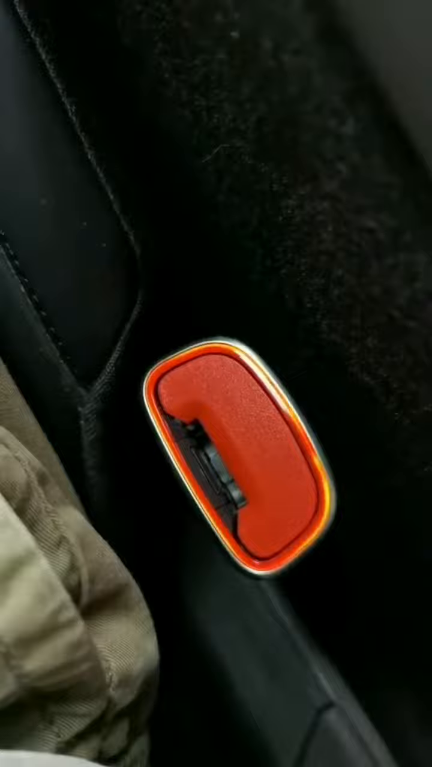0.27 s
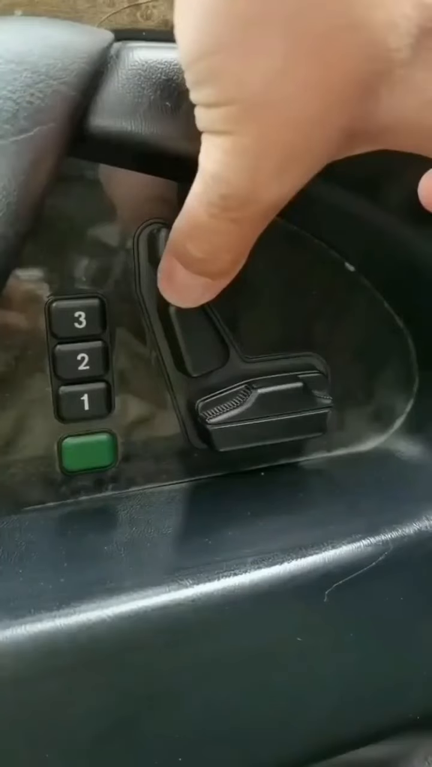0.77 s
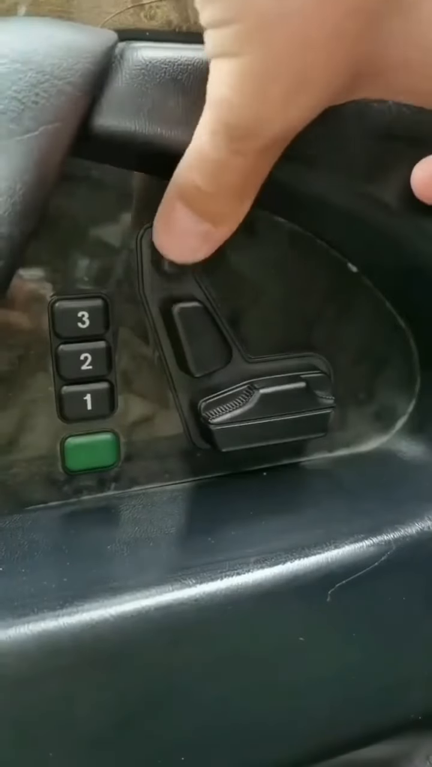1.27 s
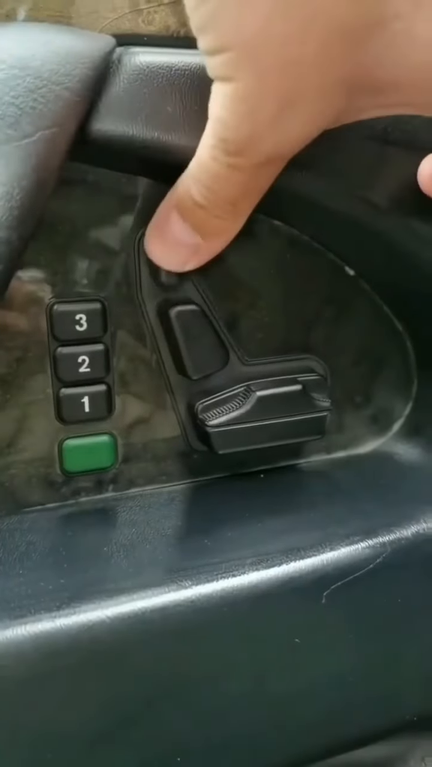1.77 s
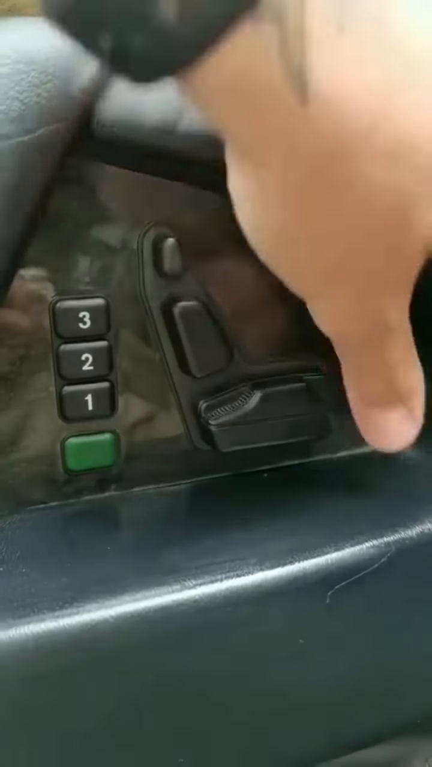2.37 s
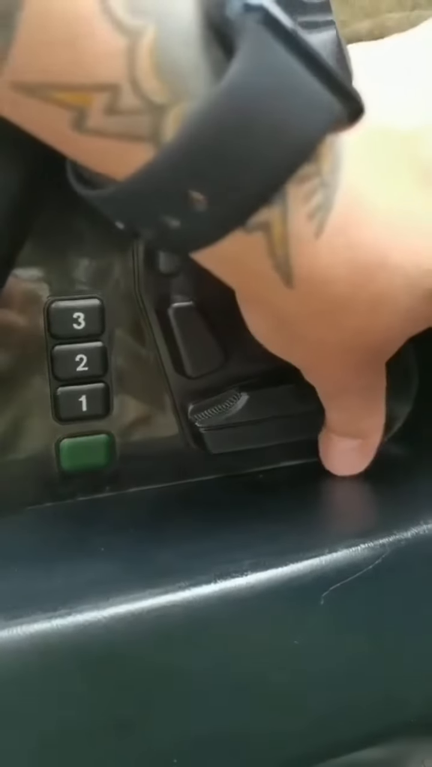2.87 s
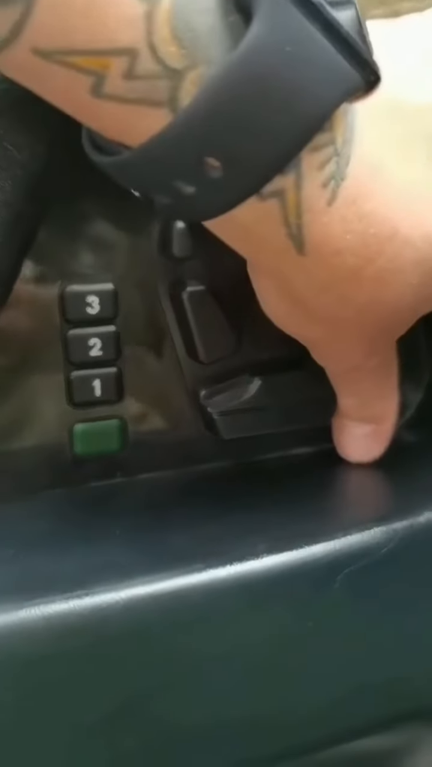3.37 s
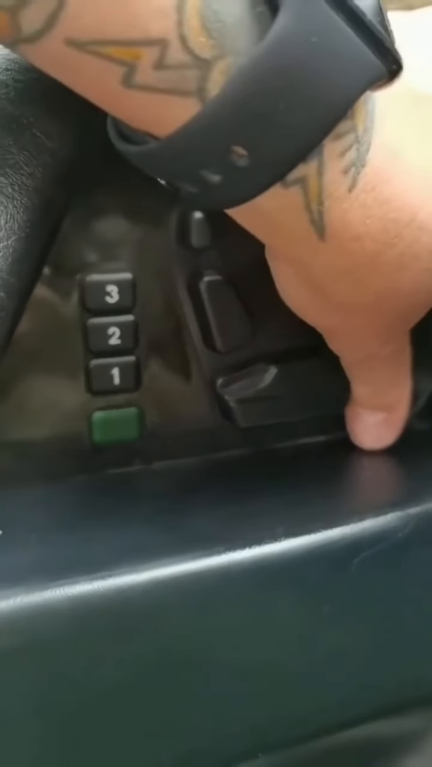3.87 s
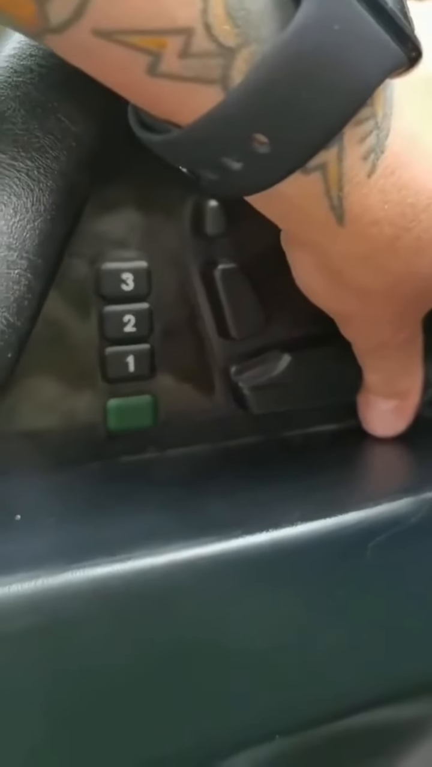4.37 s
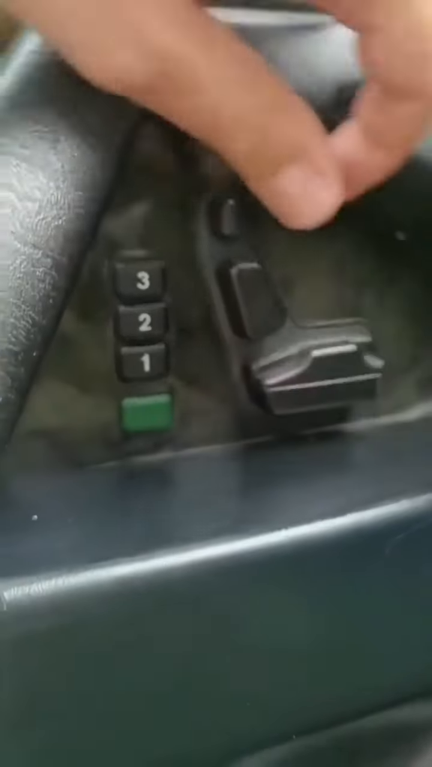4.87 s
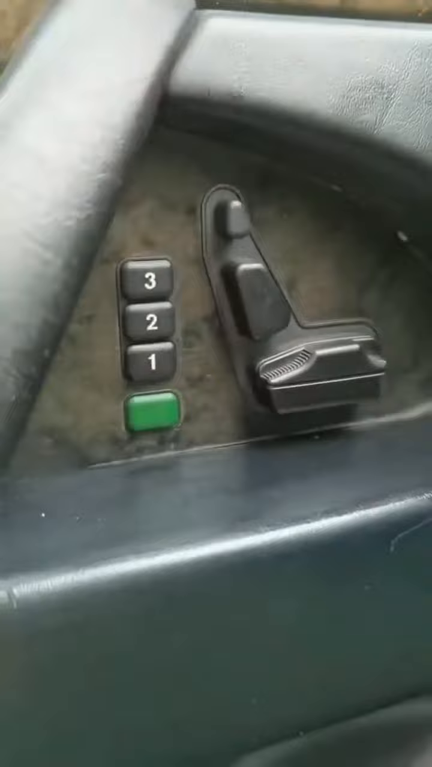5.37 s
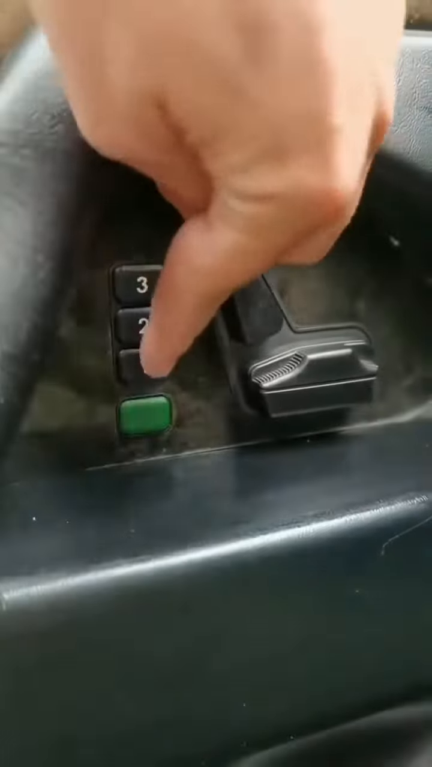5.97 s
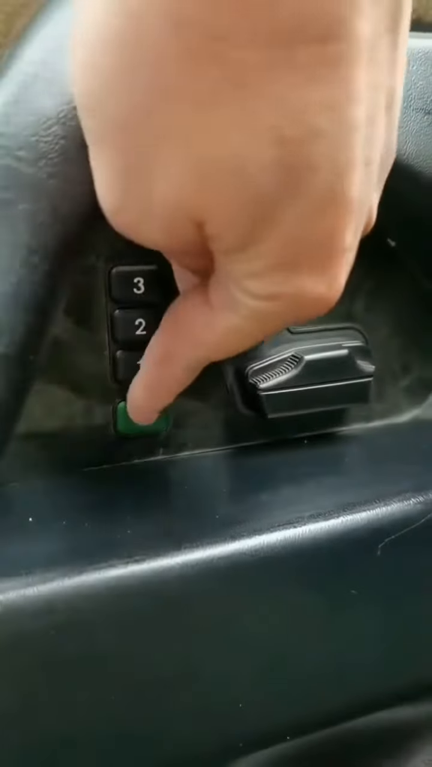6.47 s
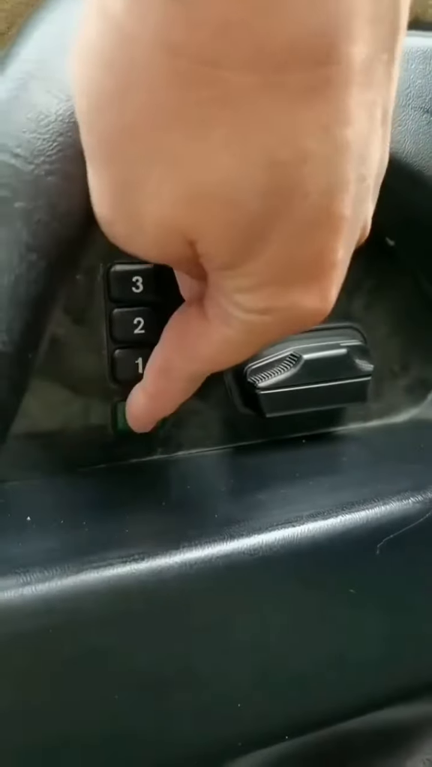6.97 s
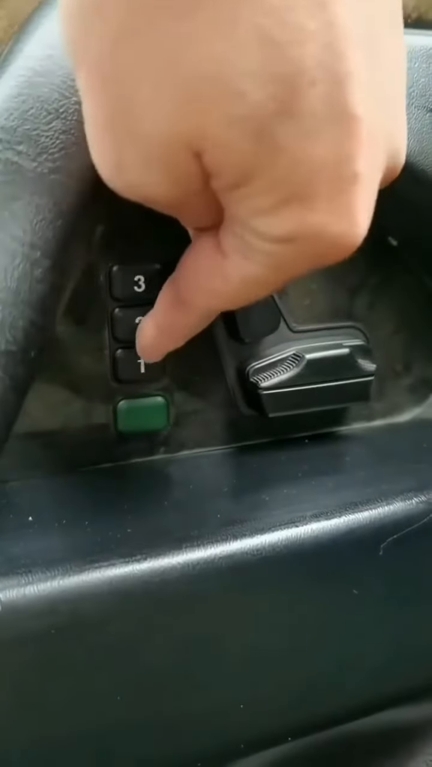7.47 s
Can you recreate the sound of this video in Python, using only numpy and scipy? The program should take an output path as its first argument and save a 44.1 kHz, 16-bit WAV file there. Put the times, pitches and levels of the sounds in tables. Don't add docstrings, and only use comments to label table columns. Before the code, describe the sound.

Inside an idling car, plastic seat switches snap and creak under a thumb, a small electric motor whirs briefly, then softer button clicks follow.

```python
import sys
import numpy as np
from scipy import signal
from scipy.fft import rfft, irfft
from scipy.io import wavfile
from scipy.ndimage import uniform_filter1d

SR = 44100
rng = np.random.default_rng(int(sys.argv[2]) if len(sys.argv) > 2 else 0)


def store_wav(level_fs):
    pcm = np.round(np.clip(np.atleast_2d(level_fs), -1, 1) * 32767)
    wavfile.write(sys.argv[1], SR, pcm.T.astype(np.int16))


def magnitude_from_level(level_db):
    exponent = np.asarray(level_db, float) / 20
    return 10 ** exponent


N = 340452
T = np.arange(N) / SR
LEAD_S = .007


def unit(x):
    return x / np.sqrt(np.mean(x ** 2))


def peak(x, db):
    return x * magnitude_from_level(db) / np.abs(x).max()


def coloured(points):
    hz, db = np.transpose(points)
    log_f = np.log(np.arange(N // 2 + 1) * SR / N + 1)
    gain = magnitude_from_level(np.interp(log_f, np.log(hz), db, left=-160, right=-160)) * np.sqrt(SR / 2)
    return irfft(rfft(rng.standard_normal(N)) * gain, N)


def ring(x, hz, width_hz):
    return signal.lfilter(*signal.iirpeak(hz, hz / max(width_hz, 20), SR), x)


def band(x, lo_hz, hi_hz):
    return signal.sosfilt(signal.butter(3, [lo_hz, hi_hz], "band", fs=SR, output="sos"), x)


def high(x, order, hz):
    return signal.sosfilt(signal.butter(order, hz, "high", fs=SR, output="sos"), x)


def walk(rate):
    k = int(SR / rate)
    held = np.repeat(rng.standard_normal(N // k + 1), k)
    return 0.57 * uniform_filter1d(uniform_filter1d(held, k), k)[:N]


def swell(s, half_s):
    out = np.zeros(N)
    near = slice(max(int((s - 3 * half_s) * SR), 0), int((s + 3 * half_s) * SR))
    out[near] = magnitude_from_level(-9.5 * ((T[near] - s) / max(half_s, .01)) ** 2)
    return out


def add(out, s, x):
    i = int(s * SR)
    out[i:i + len(x)] += x[:N - i]


def first_shot():
    # f/Hz, density/dB per Hz
    hum_colour = [(15, -30), (25, -4), (183, -11.5), (244, -7.5), (300, -5), (456, -20), (507, -22),
                  (609, -27.5), (658, -33), (878, -31.5), (1030, -31.5), (1140, -39.5), (1780, -41),
                  (2400, -45), (2700, -58), (8300, -71), (9200, -65), (12800, -62)]
    hum = coloured(hum_colour)[None]
    hum = unit(.3 * hum + .7 * patchy(hum)) * magnitude_from_level(-52.5 + np.interp(T, [0, .5], [-1.5, 1.5]))
    return hum + magnitude_from_level(-82) * band(rng.standard_normal((2, N)), 240, 7300)


def engine():
    # t/s, crank turns per s
    idle = [(.5, 15.24), (2.5, 15.3), (5, 15.26), (6, 15.37), (7.72, 15.44)]
    # multiple of the crank rate, left level/dB, right level/dB
    orders = [(1.92, -70.5, -87), (3.174, -55, -66), (3.973, -58, -65.5), (5, -52, -73), (5.975, -43, -64),
              (6.95, -51, -72), (8.04, -58.5, -67), (9.59, -74, -81), (9.97, -59.5, -65.5),
              (11.21, -61, -80), (11.71, -64, -82.5), (12.8, -84.5, -81.5), (13.84, -66, -84),
              (14.83, -67, -76.5), (16.19, -64.5, -74), (18.22, -64, -84.5), (17.5, -78.5, -104),
              (20.2, -67, -89.5), (20.63, -68.5, -92.5), (24.7, -87.5, -90)]
    # f/Hz, left density/dB per Hz, right density/dB per Hz
    bed_colour = [(25.6, -78, -96.5), (49, -78, -89.5), (102.6, -65.5, -86.5), (170, -69, -88),
                  (300, -82.5, -99), (513, -87.5, -111), (752, -100, -118), (1133, -99, -119),
                  (1600, -101, -121), (2468, -113, -124), (2870, -117, -124), (5360, -120.5, -124),
                  (7540, -127, -130), (8400, -138, -140), (8700, -129, -133), (13500, -130, -133)]
    boom_hz, boom_width_hz = 89.4, 18
    turn = 2 * np.pi * np.cumsum(np.interp(T, *np.transpose(idle))) / SR + 1.509
    out = np.zeros((2, N))
    for k, *ports_db in orders:
        lag = 2.115 * np.arctan((k * idle[0][1] - boom_hz) / boom_width_hz)
        phase = k * (turn - np.array([[0], [1.01]])) + np.array([[0], [3.1]])
        phase = phase - lag + 0.094 * walk(3.5)
        out += np.sqrt(2) * magnitude_from_level(np.c_[ports_db]) * magnitude_from_level(1.1 * walk(4)) * np.cos(phase)
    throb = unit(magnitude_from_level(2.6 * np.cos(2 * turn + .5) + 2.1 * np.cos(turn + .3)))
    hz, *ports_density = np.transpose(bed_colour)
    for side, db in zip(out, ports_density):
        bed = coloured(np.transpose([hz, db]))
        hiss = high(bed, 2, 2500)
        side += (bed - hiss) * throb * magnitude_from_level(2.0 * walk(3.8)) + hiss
    return out


def wind():
    # f/Hz, density/dB per Hz
    wind_colour = [(25, -16.5), (50, 0.5), (120, 2), (200, -9), (400, -19.5), (900, -37), (2000, -46)]
    # middle t/s, peak level/dB, half length/s
    gusts = [(0.703, -51, 0.037), (.85, -55.5, .05), (1.05, -69, .08), (1.907, -60.5, 0.18),
             (3.333, -57, 0.07), (3.99, -50, 0.15), (4.15, -46.5, 0.078), (4.359, -46.5, 0.075),
             (4.549, -50.5, 0.13), (4.783, -47.5, 0.1), (5.186, -46.5, 0.19), (5.481, -55.5, 0.11),
             (5.808, -59.5, 0.13), (6.252, -61.5, 0.14), (6.843, -56.5, 0.051), (7.097, -59, .1),
             (7.4, -63, 0.081)]
    turbulence = unit(coloured(wind_colour) * magnitude_from_level(2.5 * walk(35)))
    return turbulence * (magnitude_from_level(-72.5) + sum(magnitude_from_level(db) * swell(s, half_s) for s, db, half_s in gusts))


def fan():
    # f/Hz, width/Hz, level/dB
    ducts = [(1114.5, 53, -82), (1593, 60, -85), (2147, 350, -89.5)]
    out = np.zeros(N)
    for hz, width_hz, db in ducts:
        air = ring(ring(rng.standard_normal(N), hz, width_hz), hz, width_hz * 2)
        out += unit(air) * magnitude_from_level(db + 5.9 * walk(11.0))
    return out


def rub():
    # f/Hz, density/dB per Hz
    rub_colour = [(1500, -16.5), (2500, 18.5), (4200, 20), (5900, 19.5), (7300, -3.5), (8000, -34),
                  (13000, -40)]
    # middle t/s, half length/s, hiss level/dB, panel level/dB
    strokes = [(0.611, 0.051, -72, -65), (0.768, 0.088, -90, -63.5), (1.499, 0.08, -74.5, -63.5),
               (1.879, 0.17, -79.5, -65), (1.925, 0.046, -71, -67), (2.454, 0.34, -105, -78.5),
               (2.98, 0.058, -66.5, -70), (3.122, 0.1, -76, -63), (3.284, 0.041, -80, -63),
               (4.787, 0.14, -71, -65), (4.895, 0.039, -71, -65), (5.095, 0.059, -71.5, -70),
               (5.308, 0.04, -76, -77), (5.486, 0.083, -74, -78.5), (6.02, 0.13, -100, -73.5),
               (6.664, 0.18, -100, -74.5), (7.069, 0.083, -86, -71.5), (7.655, 0.076, -110, -71),
               (7.404, 0.1, -80, -69), (6.47, 0.046, -91.5, -84)]
    grain = magnitude_from_level(7.5 * walk(300) + 2.8 * walk(36))
    hiss = unit(coloured(rub_colour) * grain)
    panel = unit(band(rng.standard_normal(N) * grain, 450, 1500))
    return sum(swell(s, half_s) * (hiss * magnitude_from_level(hiss_db) + panel * magnitude_from_level(panel_db))
               for s, half_s, hiss_db, panel_db in strokes)


def push():
    t = T[:SR // 8] - LEAD_S
    return np.exp(-((t - .0015) / 0.0002) ** 2)


def slip(snap_db, panel_db, panel_hz, air_db, bright_hz):
    # f/Hz, width/Hz, level/dB
    cap_modes = [(1830, 340, -6.5), (2260, 350, 4), (2600, 1500, 0), (3426, 280, 2.5), (4050, 200, 4.5),
                 (4600, 260, -3), (5390, 170, 3), (5920, 310, 3.5), (6600, 400, -9)]
    # f/Hz, width/Hz, level/dB
    air_modes = [(7300, 410, 0.5), (8000, 770, 3.5), (9070, 400, -1), (10420, 700, -8.5),
                 (12200, 680, -1.5), (9700, 17000, -6)]
    t = T[:SR // 8] - LEAD_S
    late = np.maximum(t, 0)
    skirt = 0.34 * np.exp(np.minimum(t, 0) / 0.002) * (np.exp(-late / 0.0082) + 0.15 * np.exp(-late / 0.032))
    shape = late ** 2 * np.exp(-late / 0.00077) / 0.00063 ** 2 + skirt
    noise = rng.standard_normal((2, len(t)))
    instant = 2.5 * np.exp(-((t - .0013) / .00003) ** 2)
    blow = noise[0] * shape * magnitude_from_level(3.0 * noise[1]) + instant

    snap = np.zeros(len(t))
    for hz, width_hz, db in cap_modes:
        level_spread, pitch_spread = rng.standard_normal(2)
        snap += magnitude_from_level(db + 2.0 * level_spread) * ring(blow, hz * (1 + .02 * pitch_spread), width_hz)
    snap = band(0.35 * snap + 0.05 * blow + ring(snap + 1.3 * blow, bright_hz, 560), 1500, 7000)

    upper_hz, lower_hz = 1.2 * panel_hz, .62 * panel_hz
    panel = ring(ring(push() + .4 * blow, panel_hz, 290), panel_hz, 450)
    panel += magnitude_from_level(-6.5) * ring(ring(push() + 0.14 * blow, upper_hz, 200), upper_hz, 310)
    panel += magnitude_from_level(-13) * ring(push() + 0.23 * blow, lower_hz, 240)

    air = sum(magnitude_from_level(db) * ring(noise[1] * shape ** 1.1, hz, width_hz) for hz, width_hz, db in air_modes)
    air = band(air, 6400, 12900)
    return peak(snap, snap_db) + peak(panel, snap_db + panel_db) + peak(air, snap_db + air_db)


def creaks():
    # t/s, peak level/dB, panel level/dB re peak, panel f/Hz
    trim_slips = [(0.5702, -56.5, 0, 1090), (0.583, -54.5, 0, 886), (0.6426, -50.5, -1.5, 930),
                  (0.741, -64.5, 14, 905), (0.7553, -53, 0, 961), (1.419, -73, 22.5, 1020),
                  (1.589, -58.5, 3, 670), (2.456, -43.5, 0, 1000), (2.617, -64, 2.5, 1100),
                  (3.0072, -52, -1, 1090), (1.926, -46, -2, 820), (1.9345, -59, -5, 910),
                  (2.0764, -59, -7, 552), (2.5889, -56, -6, 1050), (2.687, -61.5, 8.5, 922),
                  (3.738, -60, -11, 1050), (5.013, -68, 10, 1350), (5.7096, -59.5, 6, 687),
                  (6.6013, -77, 10.5, 1086), (6.6165, -72, 7, 960), (7.021, -82, 22, 1700),
                  (7.3393, -60, 4, 560), (7.6497, -73, 19.5, 993), (3.563, -64, -8, 900),
                  (4.8904, -45, 0, 910)]
    out = np.zeros(N)
    for s, db, panel_db, panel_hz in trim_slips:
        add(out, s - LEAD_S - .001, slip(db, panel_db, panel_hz, -26.5, 2290))
    return out


def thumps():
    # t/s, peak level of the tone/dB, f/Hz, length/s
    jolts = [(0.573, -37.5, 62, 0.091), (.62, -45, 189.5, 0.47), (.78, -38.5, 127, 0.05),
             (1.8, -40.5, 170, 0.11), (1.84, -37.5, 131.8, 0.12), (2.301, -52, 334, 0.23),
             (3.183, -34.5, 113, 0.064), (3.252, -39, 300, 0.057), (3.282, -45.5, 357, 0.024),
             (3.292, -31.5, 248, 0.017), (3.328, -26.5, 101, 0.045), (3.329, -44.5, 257.4, 0.11),
             (3.331, -39, 293, 0.018), (3.325, -37, 356, 0.037), (4.861, -32.5, 104.5, 0.14),
             (4.864, -31, 433, 0.0064), (7.058, -32, 125, 0.019)]
    out = np.zeros(N)
    for s, db, hz, length in jolts:
        t = T[:int(4 * length * SR)]
        envelope = t / length * 4 * np.exp(1 - t / length * 4)
        rough = ring(ring(rng.standard_normal(2 * SR)[:len(t) + SR // 10], hz, hz * .5), hz, hz)
        add(out, s, magnitude_from_level(db) * envelope * (np.sin(2 * np.pi * hz * t) + .45 * unit(rough)[:len(t)]))
    return out


def switches():
    # t/s, peak level/dB, panel level/dB re peak, air level/dB re peak, brightest f/Hz
    rocker = [
        (.6043, -38, -7, -8, 3300),
        (.606, -41.5, -19, -9, 5930),
        (.7769, -27, -2.5, -10, 6070),
        (.8317, -53.5, -1, -7, 2160),
        (1.4453, -26.5, 0, -12, 5510),
        (1.8768, -26, -2.5, -14.5, 5950),
        (1.9165, -42, -6, -16, 5920),
        (2.441, -31, -3, -9, 5760),
        (3.1799, -28, -4, 2, 5360),
    ]
    slider = [ (2.9423, -55, -19, -11, 4360), (2.9665, -36.5, -30, -10, 5160),
              (2.9756, -37.5, -22, -5, 4600), (3.0003, -47.5, -4, -5, 2970), (3.0145, -35.5, -8, -15, 3800),
              (3.21, -64, -20, 0, 5940), (3.2382, -48, 3, -27, 2660), (3.2653, -29, -18, -22, 5070),
              (4.0335, -45, -5, -20, 4400), (4.0376, -41, -4, -20, 2350), (4.0435, -49, -6, -25, 1950),
              (4.7095, -54, -6, -25, 2200), (4.7263, -36.5, -6, -13, 3400), (4.813, -32, -10, -24, 4100),
              (4.838, -41.5, -9, -18, 3720), (4.865, -28, -10, -5, 6100), (4.905, -34.5, -11, -5, 2800)]
    button = [
        (7.0555, -49.5, 16, -37, 2180),
        (7.0605, -42, -3, -34, 3580),
        (7.3449, -39, -3.5, -49, 4600),
    ]
    out = np.zeros(N)
    for rows, panel_hz in ((rocker, 863), (slider, 986), (button, 795)):
        for s, db, panel_db, air_db, bright_hz in rows:
            add(out, s - LEAD_S - .001, slip(db, panel_db, panel_hz, air_db, bright_hz))
    return out


def pings():
    # t/s, peak level/dB, f/Hz
    free_modes = [(.605, -49, 1900), (.605, -49, 2400), (.778, -37, 5900), (.778, -45, 2100),
                  (1.446, -41, 1900), (1.446, -42, 2250), (1.446, -38, 5330), (1.878, -34, 5850),
                  (1.878, -31, 6350), (2.442, -39, 5700), (3.181, -38, 5400), (3.181, -38, 9300),
                  (3.266, -39, 3300), (3.266, -40, 4200), (4.038, -49, 3300), (4.038, -50, 4300),
                  (4.727, -44, 3400), (4.727, -46, 4150), (4.866, -41, 3700), (4.866, -44, 9200),
                  (4.866, -44, 10500), (4.8135, -36, 4200), (4.82, -42, 3600), (.605, -45, 6000),
                  (.605, -46, 3300), (7.346, -45, 4300), (7.346, -44, 4750)]
    out, t = np.zeros(N), T[:1500]
    for s, db, hz in free_modes:
        envelope = (1 - np.exp(-t / .0005)) * np.exp(-t / .003)
        add(out, s, magnitude_from_level(db) * envelope * np.sin(2 * np.pi * hz * t))
    return out


def swishes():
    # t/s, peak level/dB, centre f/Hz, length/s
    nail = [
        (1.59, -51, 2610, .024),
        (2.448, -34.5, 5500, 0.022),
        (2.585, -50.5, 2400, 0.017),
        (2.968, -41.5, 4510, 0.078),
        (3.0, -38, 4120, 0.014),
        (3.1741, -35.5, 5170, 0.0087),
        (3.189, -52, 5950, 0.0086),
        (3.237, -37, 2620, 0.078),
        (4.723, -40, 3400, 0.016),
        (5.713, -49.5, 3070, 0.017),
    ]
    # t/s, peak level/dB, centre f/Hz, length/s
    pad = [ (0.61, -51.5, 2560, 0.082), (.8323, -46, 2820, 0.033), (1.824, -48, 4800, 0.012),
           (1.84, -43, 4800, 0.0057), (1.866, -36.5, 6290, 0.031), (1.899, -46, 5800, 0.032),
           (1.917, -40, 5700, 0.039), (1.946, -44, 2730, 0.021), (1.982, -52.5, 2550, 0.025),
           (2.0668, -49.5, 2530, 0.042), (2.6, -60, 5040, 0.02), (5.42, -61.5, 5000, 0.078),
           (5.499, -62.5, 5550, .06), (3.26, -39.5, 5380, 0.013), (4.913, -59, 4300, 0.011),
           (5.004, -49, 5180, 0.042), (5.101, -58, 2600, 0.036), (5.562, -57, 3200, 0.034),
           (6.056, -61.5, 2600, 0.051), (6.44, -65.5, 3150, 0.029), (6.613, -58, 2640, 0.025),
           (7.067, -66, 4200, 0.028), (7.348, -48, 4480, 0.028)]
    # t/s, peak level/dB, centre f/Hz, length/s
    skid = [
        (4.868, -38.5, 6100, 0.012),
        (4.876, -30, 5100, .02),
        (4.883, -33, 6400, .014),
        (1.452, -38, 5800, .012),
        (.789, -40.5, 5900, .014),
        (1.884, -43, 5900, .012),
    ]
    out, t = np.zeros(N), T[:SR // 5]
    for rows, panel_db, air_db in ((nail, -4.5, -20), (pad, -2.5, -30), (skid, -12.5, -18)):
        for s, db, hz, length in rows:
            noise = rng.standard_normal((2, len(t)))
            grit = noise[0] * magnitude_from_level(4.5 * uniform_filter1d(noise[1], size=140) * 12)
            grit *= (1 - np.exp(-t / 0.0037)) * np.exp(-2 * t / max(length, .008))
            scrape = peak(band(ring(grit, hz, 1.2 * hz) + .3 * grit, 1700, 6500), 0)
            scrape += peak(band(grit, 350, 1284), panel_db)
            scrape += peak(band(grit, 9100, 14000), air_db)
            add(out, s, scrape * magnitude_from_level(db - 2))
    return out


def hollow():
    # middle t/s, half length/s, level/dB, f/Hz
    hums = [
        (1.53, 0.036, -75, 1600),
        (2.515, 0.042, -72, 1600),
        (4.945, 0.052, -71, 1480),
        (6.471, 0.038, -76, 1600),
        (7.45, 0.054, -74.5, 1600),
        (0.647, 0.013, -69, 900),
        (.84, 0.018, -65.5, 1100),
    ]
    noise = rng.standard_normal(N)
    return sum(unit(ring(ring(noise, hz, 160), hz, 300)) * magnitude_from_level(db) * swell(s, half_s)
               for s, half_s, db, hz in hums)


def flexes():
    # middle t/s, peak level/dB, f/Hz, half length/s
    recoils = [(4.7115, -43, 1050, .002), (4.7292, -34, 1000, .0018), (4.0395, -35, 980, .0018),
               (4.036, -46, 1000, .0015), (3.1268, -44, 960, .002), (3.152, -44, 970, .002),
               (3.165, -52, 950, .002), (.6445, -53, 900, .004), (.682, -50, 850, .004),
               (.7445, -52, 1000, .0015), (.756, -53, 1050, .0015), (3.017, -47, 1020, .002),
               (3.001, -48, 950, .0015), (3.008, -48, 1100, .0015), (3.243, -49, 1110, .003),
               (3.261, -44, 950, .0015), (3.193, -49, 950, .002)]
    out, t = np.zeros(N), T[:2000]
    for s, db, hz, half_s in recoils:
        add(out, s - .02, magnitude_from_level(db) * np.exp(-((t - .02) / half_s) ** 2) * np.sin(2 * np.pi * hz * t))
    return out


def knocks():
    # t/s, peak level/dB, f/Hz
    blows = [(0.662, -49, 835), (0.7, -59, 590), (3.061, -50, 855), (3.083, -59, 947), (3.098, -47, 940),
             (3.74, -45.5, 1000), (4.785, -57, 1190), (6.056, -43.5, 555), (6.616, -50.5, 980),
             (7.4076, -42, 984), (7.65, -61, 1980), (4.7398, -55, 1050), (4.049, -49, 1050),
             (4.004, -56, 1050), (4.8132, -37.5, 1200), (4.906, -42, 1250), (4.8655, -38, 650),
             (4.9055, -43, 700), (4.7275, -46, 600), (7.057, -42, 520), (3.181, -40, 600),
             (4.845, -52, 900), (4.039, -46, 650), (1.447, -42, 560), (4.874, -44, 600)]
    out = np.zeros(N)
    twice = push() + magnitude_from_level(-16) * np.roll(push(), int(0.01 * SR))
    for s, db, hz in blows:
        add(out, s - LEAD_S - .001, peak(ring(ring(twice, hz, 300), hz, 420), db))
    return out


def judder():
    # t/s, peak level/dB, panel level/dB re peak
    ratchet = [
        (1.7829, -51.5, 2.5),
        (1.794, -49.5, 4),
        (1.8055, -48, 4.5),
        (1.8222, -46, 4.5),
        (1.8387, -46.5, 2),
        (1.8535, -44, 2.5),
        (1.8665, -49, 4),
        (1.8895, -47, -6),
        (1.953, -51.5, 2),
        (1.9799, -54.5, 6),
    ]
    out, trim_hz = np.zeros(N), 530
    hum = ring(ring(push(), trim_hz, 73), trim_hz, 300)
    for s, db, panel_db in ratchet:
        add(out, s - LEAD_S - .001, slip(db, panel_db, 760, -26, 3800))
        add(out, s - LEAD_S, peak(hum, db + panel_db - 1.5))
    return out


def motor():
    # t/s, rotor f/Hz, brush hiss level/dB
    run = [
        (3.272, 128, -105),
        (3.321, 131.3, -67.5),
        (3.418, 134, -71.5),
        (3.899, 134, -75.5),
        (4.101, 127.5, -73),
        (4.681, 130.4, -73.5),
        (4.73, 123, -66),
    ]
    # multiple of the rotor rate, level/dB re hiss
    harmonics = [(3, 7.5), (4, 5), (6, -6), (8, -1)]
    # f/Hz, density/dB per Hz
    brush_colour = [(300, 3), (1100, 3.5), (2000, -4), (3500, -4.5), (4800, -3), (5900, 3.5), (6500, -5),
                    (6800, -51.5)]
    # t/s, level/dB
    sheen_level = [(3.3, 1.5), (3.55, 2), (3.65, -3), (3.85, -2.5), (4.0, 5.5), (4.25, -11.5), (4.7, -11)]
    # middle t/s, half length/s, level/dB re hiss
    sparks = [
        (3.31, .015, -10),
        (3.365, .02, -13),
        (3.475, .025, -16),
        (3.69, .015, -19),
        (3.85, .05, -18),
        (4.06, .02, -13),
    ]
    s, hz, db = np.transpose(run)
    turn = 2 * np.pi * np.cumsum(np.interp(T, s, hz) * (1 + 0.003 * walk(5.2))) / SR
    whine = sum(magnitude_from_level(level_db + 4 * walk(10)) * np.sin(k * turn) for k, level_db in harmonics)
    whine *= magnitude_from_level(np.interp(T, [3.9, 4.05], [0, -9]))
    hiss = unit(coloured(brush_colour) * (1 + 0.25 * np.cos(turn)) * magnitude_from_level(2.2 * walk(16)))
    sheen = signal.sosfiltfilt(signal.butter(4, 6050, "high", fs=SR, output="sos"), hiss)
    hiss += sheen * (magnitude_from_level(np.interp(T, *np.transpose(sheen_level)) + 2.5 * walk(7)) - 1)
    fizz = unit(band(rng.standard_normal(N), 6500, 7600))
    hiss += fizz * sum(magnitude_from_level(level_db) * swell(mid_s, half_s) for mid_s, half_s, level_db in sparks)
    return (whine + hiss * magnitude_from_level(5.5)) * magnitude_from_level(np.interp(T, s, db, left=-140, right=-140))


def phone_tap():
    out = np.zeros(N)
    for s in (5.712, 5.723):
        add(out, s, magnitude_from_level(-59) * rng.standard_normal(1500) * np.exp(-T[:1500] / 0.002))
    return out + band(rng.standard_normal(N), 8800, 12000) * magnitude_from_level(-80) * swell(5.72, .06)


def notched(x):
    # f/Hz, width/Hz, depth 0-1
    dips = [(2800, 100, 0.2), (3252, 66, 0), (5075, 130, 0.2), (6600, 140, 0.59), (8370, 240, 0)]
    for hz, width_hz, depth in dips:
        x = x - np.clip(depth, 0, 1) * ring(x, hz, width_hz)
    return x


def ports(x, cabin):
    far = signal.fftconvolve(ring(x, 2200, 5500), cabin)[:N]
    return np.array([2 * x, magnitude_from_level(-55) * far])


def patchy(x):
    deaf_hz = [2800, 3280, 3950, 4600, 5120]
    f, _, z = signal.stft(x, SR, nperseg=2048)
    f = f[:, None]
    near = np.sqrt(uniform_filter1d(np.abs(z) ** 2, size=24, axis=1))
    luck = uniform_filter1d(rng.standard_normal(z.shape), size=8, axis=1)
    luck = uniform_filter1d(luck, size=5, axis=2) * np.sqrt(40)
    luck += sum(1.3 * np.exp(-((f - hz) / 55) ** 2) for hz in deaf_hz)
    luck -= .35 * ((f > 2400) & (f < 6300))
    threshold = np.interp(f, [900, 2600], [.65, 1.05]) * near * magnitude_from_level(3 * luck)
    weak = (np.abs(z) < threshold) & (f > 900)
    hole = (luck > np.interp(f, [6000, 9000], [.5, .2])) & (f > 2400)
    gain = np.where(hole, .02, np.where(weak, .06, 1))
    return signal.istft(z * gain, SR)[1][:, :N]


def scene():
    cabin = rng.standard_normal(4000) * np.exp(-T[:4000] / 0.016)
    first = first_shot()
    low, gust = thumps(), wind()
    hand = notched(rub() + motor() + swishes())
    steady = engine() + ports(hand + fan() + hollow(), cabin)
    steady += np.array([low + magnitude_from_level(-8.5) * gust, magnitude_from_level(-26) * low + gust])
    clicks = creaks() + switches() + pings() + flexes() + knocks() + judder()
    second = patchy(steady) + ports(notched(clicks), cabin) + np.array([[.3], [1]]) * phone_tap()
    fade = np.clip((T - .566) / 0.00046, 0, 1)
    return first * (1 - fade) + second * fade


def band_limit(x):
    return signal.sosfilt(signal.butter(12, 13750, fs=SR, output="sos"), x)


def record(dry):
    cut = signal.sosfilt(signal.ellip(10, .3, 70, 13350, fs=SR, output="sos"), dry)
    cut = high(cut, 2, 33)
    return band_limit(cut)


dry = scene()
out = record(dry)
store_wav(out)
```